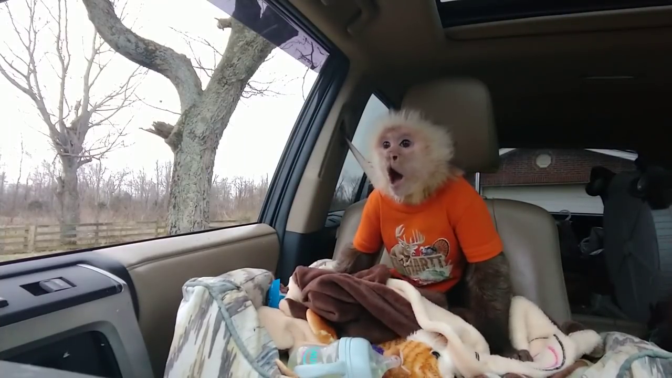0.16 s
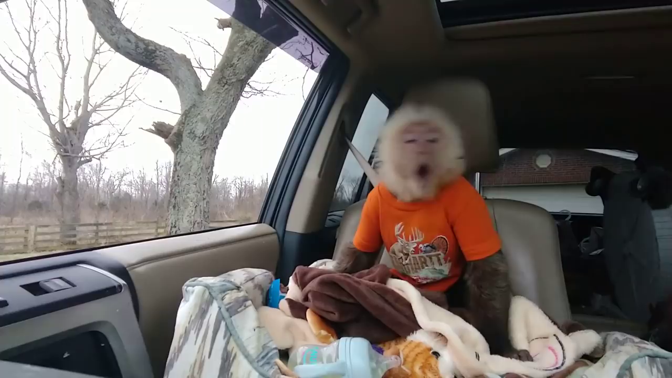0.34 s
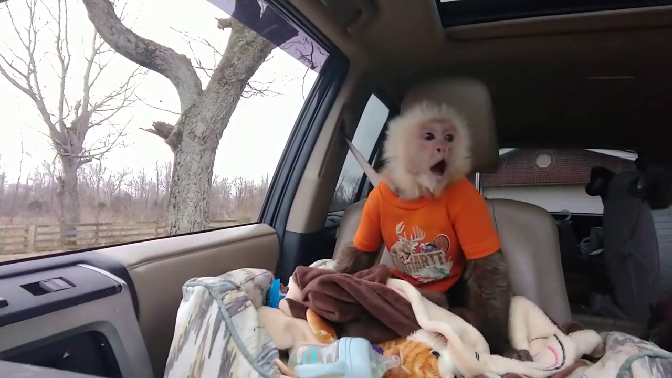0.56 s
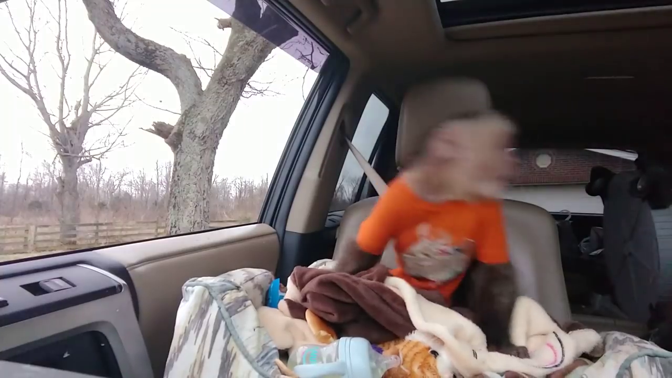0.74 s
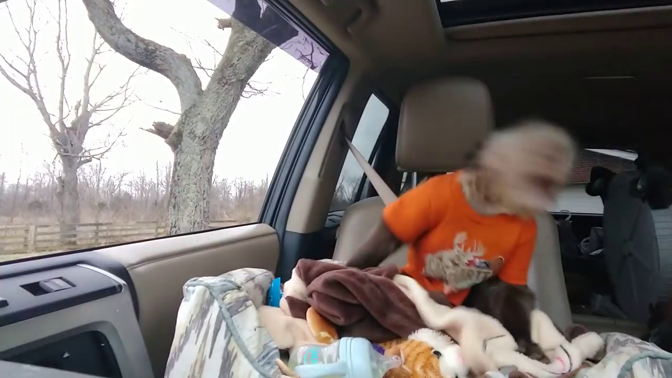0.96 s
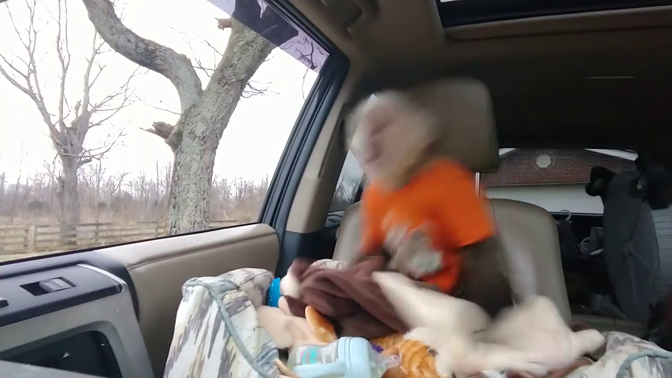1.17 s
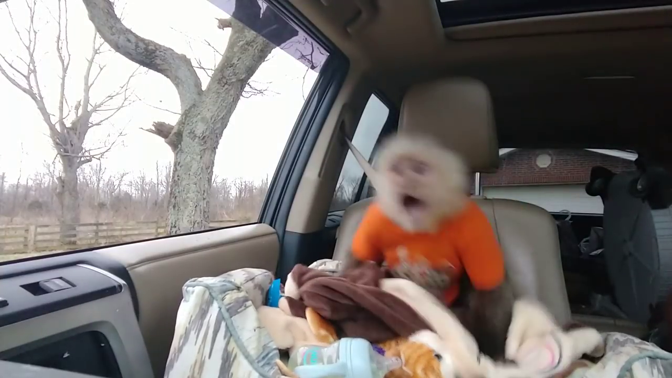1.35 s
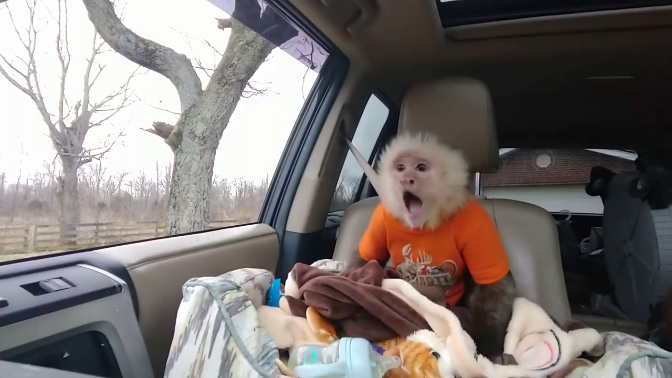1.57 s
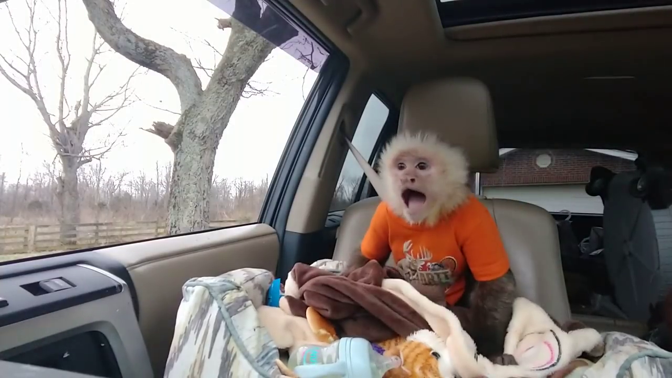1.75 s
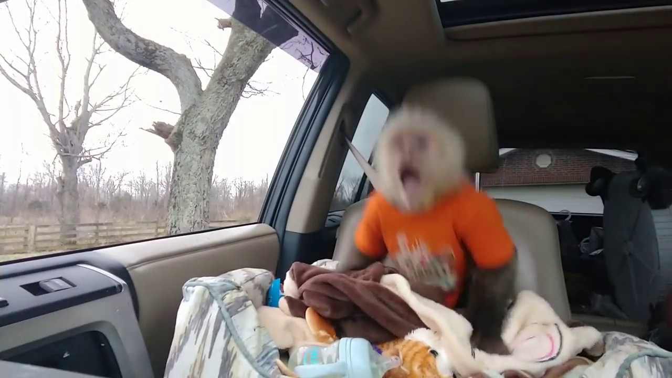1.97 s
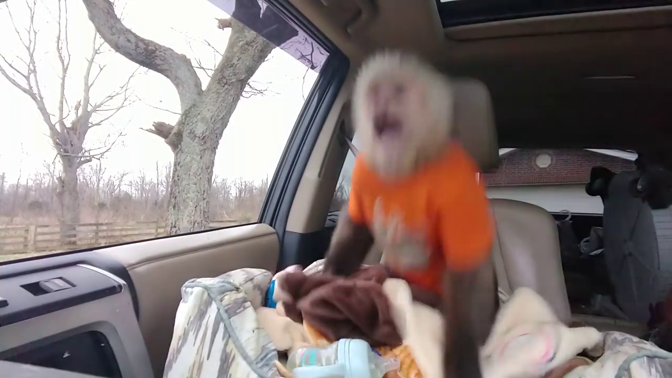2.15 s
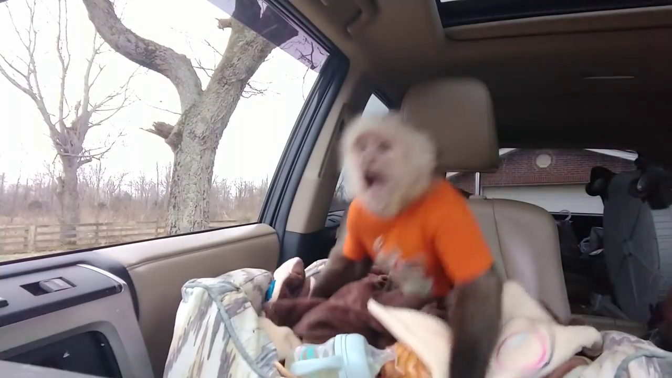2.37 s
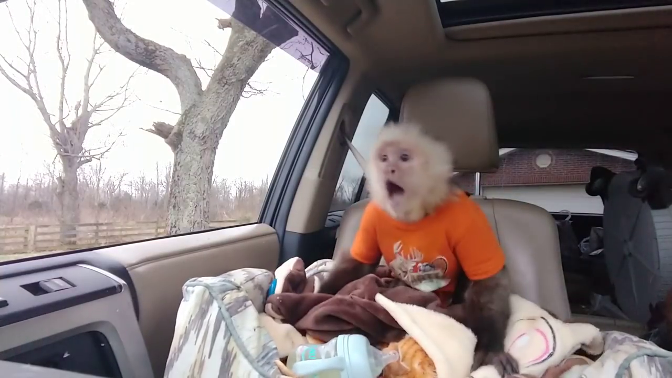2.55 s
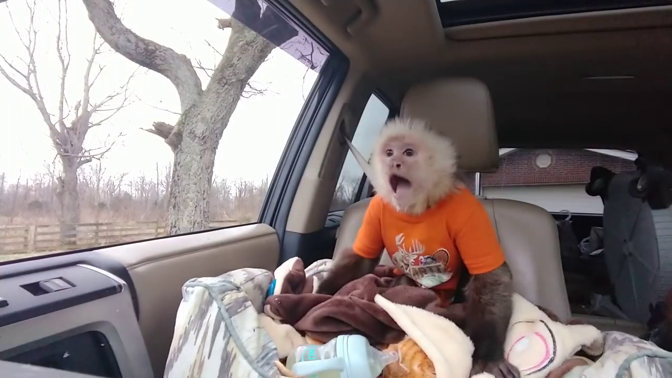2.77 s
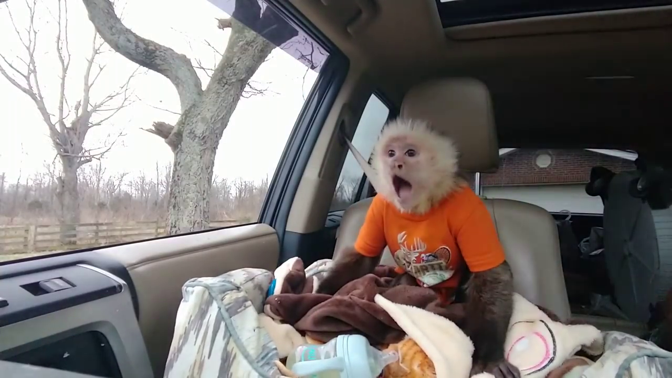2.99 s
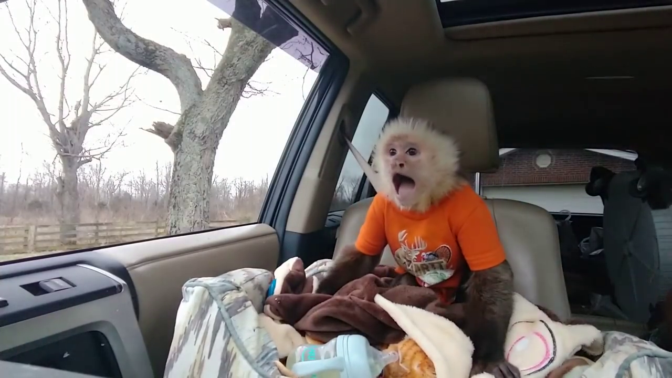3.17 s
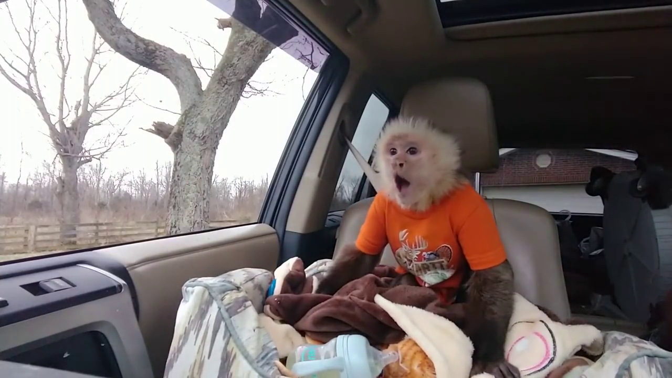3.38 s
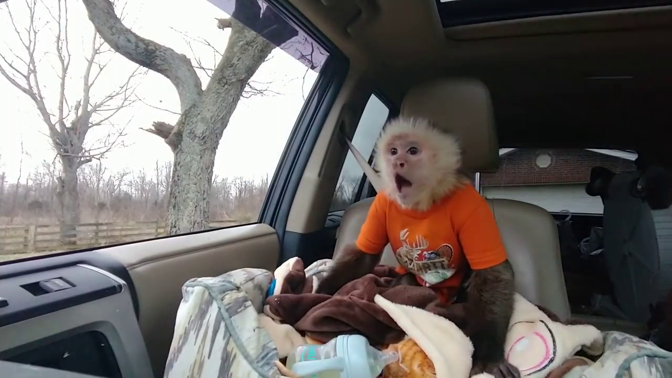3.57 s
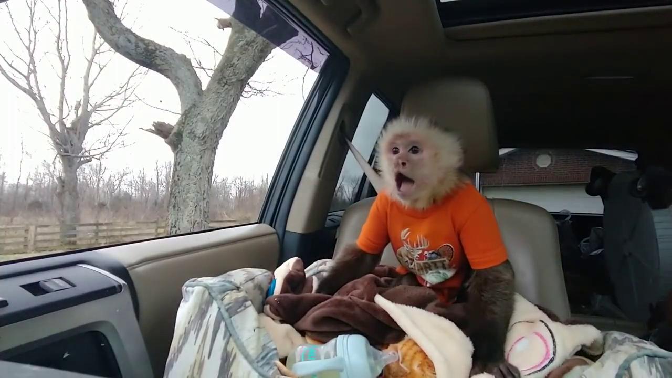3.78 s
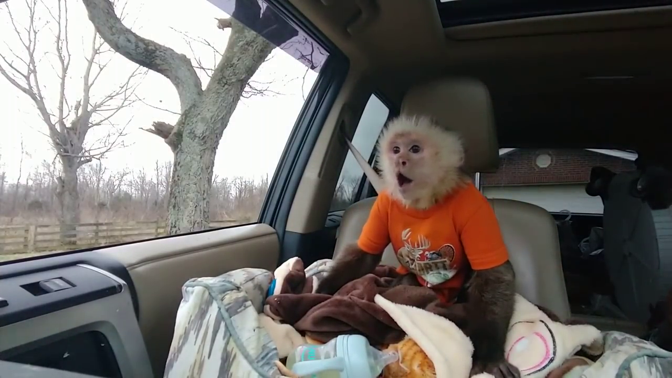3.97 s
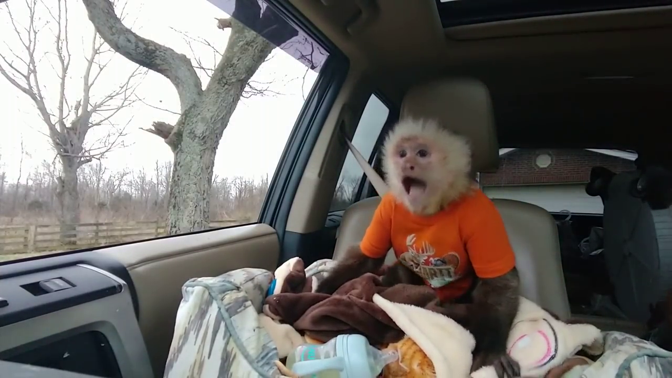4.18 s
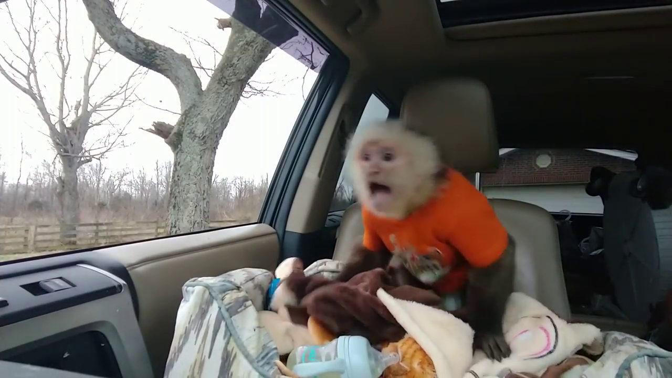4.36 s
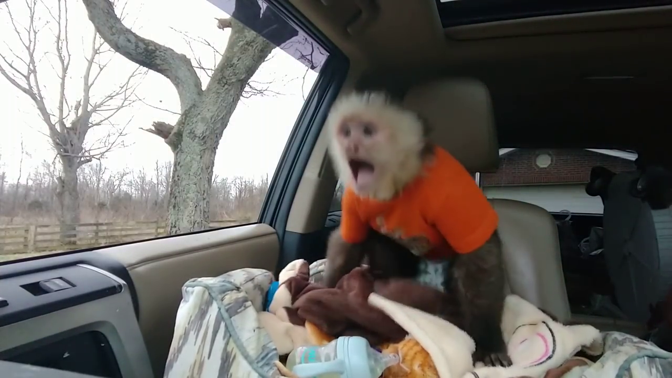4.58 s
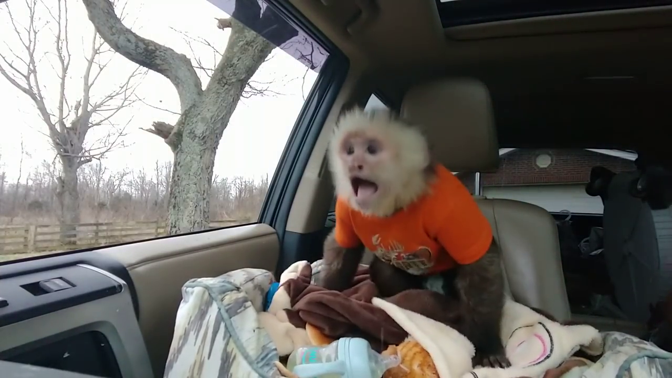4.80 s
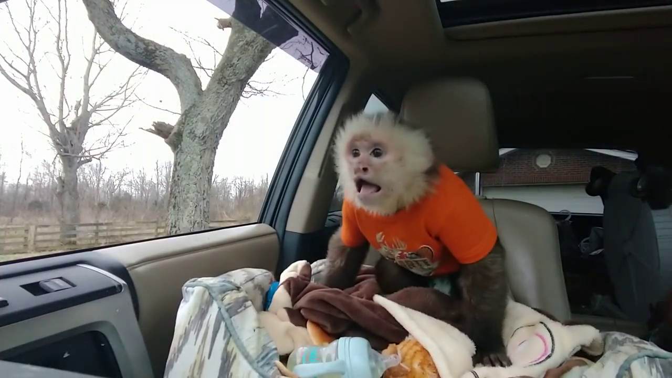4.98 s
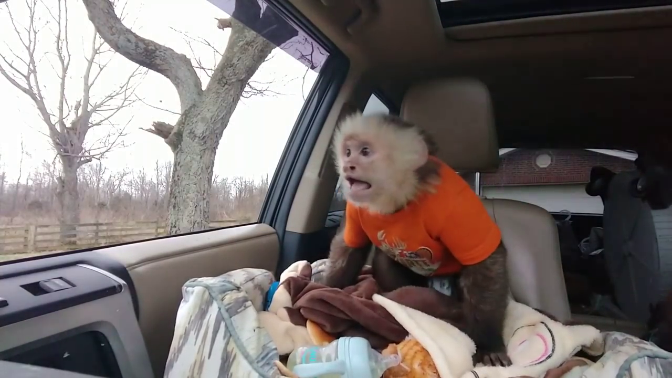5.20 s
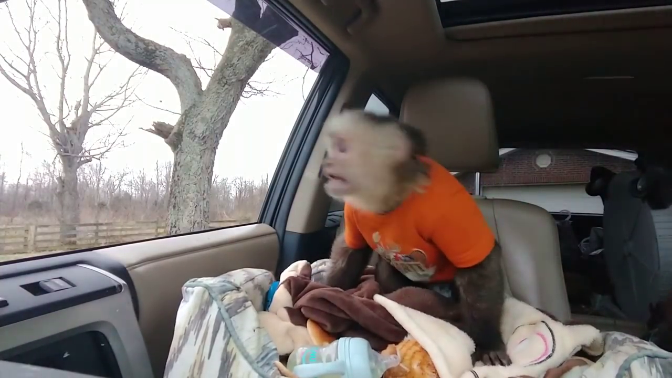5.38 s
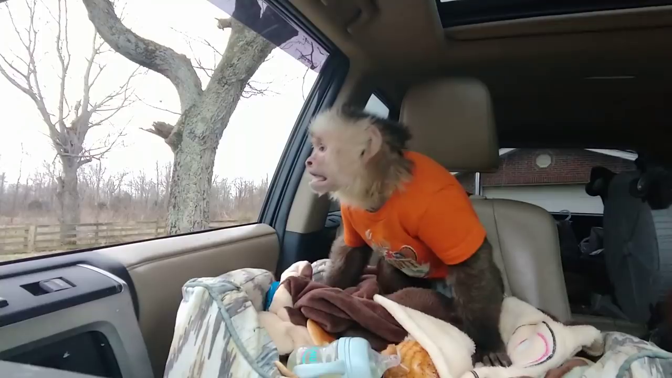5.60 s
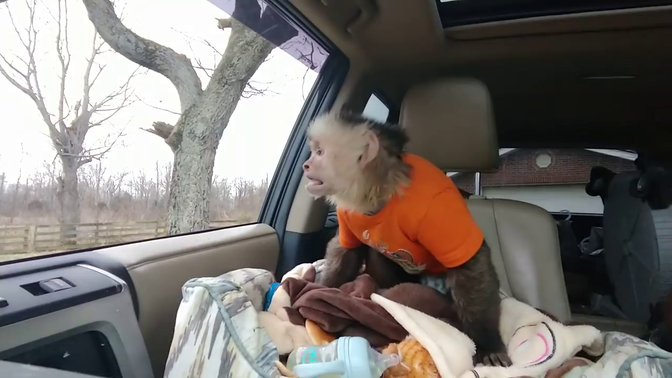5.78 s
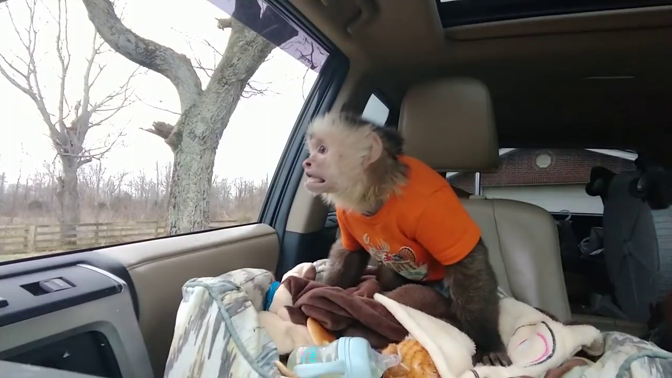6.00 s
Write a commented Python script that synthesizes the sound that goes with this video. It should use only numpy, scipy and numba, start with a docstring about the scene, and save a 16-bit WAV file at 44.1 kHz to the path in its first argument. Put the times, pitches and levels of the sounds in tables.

```python
"""First a rasping bark, already running on into a growl: a small monkey on a car seat, an arm's length from a phone.
It barks alarm calls: slapping folds and rushing air ring through throat, mouth and lips. Most barks open with
a clean squeak of gliding partials; some run on into a fluttering growl; low grunts and panting fall between.
The padded cabin rings briefly as decaying noise. Low rumble from outside, shaped noise, swells at the end
under faint far whistles, which are wavering sines. The phone hears the monkey through two ports."""
import sys
import numpy as np
from scipy import signal
from scipy.fft import rfft, irfft
from scipy.io import wavfile
from scipy.ndimage import uniform_filter1d
from numba import njit

SR = 44100
rng = np.random.default_rng(int(sys.argv[2]) if len(sys.argv) > 2 else 0)


def dump_mix(stems):
    """Bounce the given channels to the path in sys.argv[1] as a 16-bit WAV at rate SR."""
    frames = np.atleast_2d(stems).T  # one column per channel
    limited = np.clip(frames, -1, 1)  # hard clip at full scale
    pcm = np.round(limited * 32767).astype(np.int16)
    wavfile.write(sys.argv[1], SR, pcm)


N = 266496
TIME = np.arange(N) / SR  # s
TOP_HZ = 15900  # upper limit of the phone, and of the squeak partials


def undb(db):
    """Decibels to amplitude."""
    return 10 ** (np.asarray(db) / 20)


def unit(x):
    """Scale to an RMS of 1."""
    return x / np.sqrt(np.mean(x ** 2))


def add(out, s, sound):
    """Mix a sound in at a time in seconds."""
    i = int(s * SR)
    out[i:i + len(sound)] += sound[:N - i]


def shaped(x, points):
    """Gain from (frequency [Hz], level [dB]) points on a log-frequency axis."""
    hz, db = np.transpose(points)
    log_hz = np.log(np.arange(N // 2 + 1) * SR / N + 1)
    return irfft(rfft(x) * undb(np.interp(log_hz, np.log(hz), db)), N)


def wander(size):
    """Smooth chance of spread 1; size is the smoothing length in samples."""
    return unit(uniform_filter1d(uniform_filter1d(rng.standard_normal(N), size), size))


def lag(x, s):
    """Sluggish follower with a time constant in seconds."""
    return signal.lfilter([1 / (s * SR)], [1, 1 / (s * SR) - 1], x)


@njit
def band(x, g, k):
    """State-variable band-pass whose centre may move."""
    y, b, l = np.empty(len(x)), 0., 0.
    for i in range(len(x)):
        v = (b + g[i] * (x[i] - l)) / (1 + g[i] * (g[i] + k))
        b, l, y[i] = 2 * v - b, l + 2 * g[i] * v, k * v
    return y


def ring(x, modes, shift=1):
    """Sum of resonances, each passed twice for steep skirts; shift scales all centres; RMS of 1."""
    out = 0
    for k, (hz, width, db) in enumerate(modes):
        g = np.tan(np.pi * hz / SR) * shift * np.ones(N)
        once = band(x + 1e-18, g, width / hz)
        twice = band(once, g, width / hz)
        out = out + (-1) ** k * undb(db) * twice  # neighbours in opposite sign
    return unit(out)


def cycles(hz, jitter):
    """Sample indices of uneven cycles at a moving rate."""
    turns = np.cumsum(hz) / SR
    marks = np.cumsum(np.exp(jitter * rng.standard_normal(N // 10) - jitter ** 2 / 2))
    return np.searchsorted(turns, marks[marks < turns[-1]])


def slaps(hz, jitter, scatter_db):
    """One click of uneven size per cycle."""
    out, i = np.zeros(N), cycles(hz, jitter)
    out[i] = undb(scatter_db * rng.standard_normal(N // 10))[:len(i)]
    return unit(out)


# rumble outside the car, spectrum: (frequency [Hz], level [dB])
RUMBLE_SPECTRUM = [(25, -15.5), (70, -5), (230, 1), (480, -10), (1200, -17.5), (3000, -58.5)]
# rumble swelling towards the end: (time [s], level [dB])
RUMBLE_SWELL = [(0, -61), (4.3, -60.5), (5.2, -57), (5.6, -52), (6.04, -48)]
# steady hiss, spectrum: (frequency [Hz], level [dB])
HISS_SPECTRUM = [(1200, -46.5), (1600, -3), (2100, -16.5), (2800, -9), (5000, -17), (16000, -20)]
HISS_DB = -69  # before its late rise


def background():
    """Rumble, partly alike in both channels, and unrelated hiss that rises near the end too."""
    shared, left, right = (unit(shaped(rng.standard_normal(N), RUMBLE_SPECTRUM)) for _ in range(3))
    rumble = .7 * shared + .7 * np.array([undb(1.5) * left, undb(-1.5) * right])
    hiss = np.array([unit(shaped(rng.standard_normal(N), HISS_SPECTRUM)) for _ in range(2)])
    rumble_db = np.interp(TIME, *np.transpose(RUMBLE_SWELL))
    hiss_db = HISS_DB + np.interp(TIME, [5, 6], [0, 3])
    return undb(rumble_db) * rumble + undb(hiss_db) * hiss


# far whistles: (time [s], length [s], pitch at start [Hz], at end [Hz], level [dB])
FAR_WHISTLES = [(4.948, 0.13, 897, 920, -62), (5.287, 0.18, 903, 920, -61), (5.799, 0.24, 1385, 960, -59),
                (5.906, 0.19, 1547, 1120, -61)]


def whistles():
    """Thin wavering tones: sines whose pitch glides and trembles."""
    out = np.zeros(N)
    for s, length, a_hz, b_hz, db in FAR_WHISTLES:
        u = np.linspace(0, 1, int(length * SR))
        tremble = .5 * uniform_filter1d(rng.standard_normal(len(u)), size=300)
        hz = (a_hz + (b_hz - a_hz) * u) * (1 + tremble)
        add(out, s, undb(db) * np.sin(np.pi * u) ** .5 * np.sin(2 * np.pi * np.cumsum(hz) / SR))
    return out


CABIN_T60_S, CABIN_DB = 0.041, -5


def cabin(x):
    """Dense short reflections from glass and trim, different at each channel; too small a space to scatter bass."""
    t = np.arange(int(.2 * SR)) / SR
    tail = rng.standard_normal((2, len(t))) * np.exp(-np.log(1000) * t / CABIN_T60_S) * (t > .002)
    tail = tail / np.sqrt(np.sum(tail ** 2, axis=1, keepdims=True))
    upper = signal.lfilter(*signal.butter(1, 1400, "high", fs=SR), x)
    return undb(CABIN_DB) * signal.fftconvolve(upper[None], tail, axes=1)[:, :N]


# resonances of the monkey's tract, also used by its voice: (centre [Hz], width of each pass [Hz], level [dB])
THROAT_MODES = [(931, 160, 3.3), (1252, 500, 3.6), (1846, 290, 2.1)]
MOUTH_MODES = [(2480, 2000, 6.5), (3256, 130, 13.6)]
LIPS_MODES = [(5200, 1100, -2), (7086, 1360, -11), (7890, 1700, -6), (9930, 1900, -21.5),
              (13400, 2800, -23.5)]
# panting: (time [s], length [s], level [dB])
BREATHS = [(0.176, 0.14, -63.5), (0.67, 0.15, -61.5), (1.542, 0.085, -51.5), (1.875, 0.093, -53.5),
           (2.229, 0.15, -56), (2.913, 0.07, -52.5), (3.227, 0.16, -55.5), (4.795, 0.1, -67)]
PANT_EDGE_DB, PANT_PEAK = -8, .6  # level at both ends; share of the length before the peak


def panting():
    """Plain air through the same throat and mouth, swelling to a peak."""
    air, gain = rng.standard_normal(N), np.zeros(N)
    for s, length, db in BREATHS:
        u = np.linspace(0, 1, int(length * SR))
        swell_db = np.interp(u, [0, PANT_PEAK, 1], [PANT_EDGE_DB, 0, PANT_EDGE_DB])
        add(gain, s, undb(db + swell_db) * np.sin(np.pi * u) ** .2)
    return gain * (ring(air, THROAT_MODES) + undb(4.0) * ring(air, MOUTH_MODES) + undb(1.5) * ring(air, LIPS_MODES))


# chest resonances: (centre [Hz], width of each pass [Hz], level [dB])
CHEST_MODES = [(196.5, 120, 0.5), (392, 230, 6.5)]
# low voiced grunts as the folds slacken:
# (time [s], length [ms], pitch at start [Hz], at end [Hz], chest level [dB], throat minus chest [dB])
LOW_GRUNTS = [(0.109, 34, 495.3, 396, -36.5, 8.5), (0.386, 50.5, 560, 410, -43.5, -10),
              (0.497, 61, 553.8, 327, -41.5, -1.5), (0.538, 105, 539.7, 392, -39, 6),
              (.88, 23, 532, 378, -36.5, 8.5), (1.151, 41, 540.5, 191, -34, -5),
              (1.263, 60, 521, 480, -38, -6), (2.427, 29.4, 304.4, 316, -35, 0),
              (3.462, 42.6, 335.5, 256, -35.5, -1), (3.741, 45, 292.6, 220, -32.5, -1),
              (4.144, 35, 405.8, 209, -37.5, -10), (4.466, 35, 473.5, 231, -42, -10),
              (4.57, 178, 100.2, 87, -34, -0.5)]


def grunts():
    """Unsteady glottal buzz of mostly falling pitch, heard through chest and throat."""
    hz, chest, throat = np.full(N, 300.), np.zeros(N), np.zeros(N)
    for s, ms, a_hz, b_hz, db, throat_db in LOW_GRUNTS:
        u = np.linspace(0, 1, int(ms * SR / 1000))
        add(hz, s, a_hz * (b_hz / a_hz) ** u - 300)  # offset from the resting 300 Hz
        add(chest, s, undb(db) * np.sin(np.pi * u) ** 0.19)
        add(throat, s, undb(db + throat_db) * np.sin(np.pi * u) ** 0.23)
    turn = 2 * np.pi * np.cumsum(hz * (1 + .05 * wander(size=90))) / SR
    partials = sum(np.cos(k * turn) * (k * hz < 2200) * (k * hz > 150) for k in range(1, 23))
    buzz = np.sqrt(hz / 300) * partials * undb(3 * wander(size=120))
    return chest * ring(buzz, CHEST_MODES) + throat * ring(buzz, THROAT_MODES)


# squeaks: (time [s], length [ms], pitch at start, middle, end [Hz], level before the envelope [dB],
# second partial [dB], step for each higher partial [dB])
SQUEAK_NOTES = [(0.328, 17.3, 1997, 3010, 2380, -8, -1.5, -11.5),
                (0.442, 35, 1023, 1870, 3600, -30, -32.5, 1),
                (0.819, 19.4, 1984, 2850, 2730, -13.5, -1.5, -7.5),
                (1.095, 11.5, 1557, 1860, 2230, -19.5, -4, -4.5),
                (1.1046, 4.25, 2700, 2780, 3200, 1, -6, 1.5),
                (1.635, 9.3, 2190, 2730, 3320, -7.5, -0.5, -3),
                (1.968, 10.2, 2034, 2820, 3750, -7.5, -3.5, -2),
                (2.369, 21.15, 1347, 2540, 2930, -10.5, -3, -2.5),
                (2.545, 10.7, 1640, 1800, 1750, -23, 3, -5.5),
                (2.619, 18, 1097, 1034, 880, -26, -11.5, 1.5),
                (2.633, 12.5, 1320, 1500, 1300, -19.5, -20, -2),
                (2.672, 14.3, 2541, 2950, 1870, -12, -2.5, -6),
                (2.988, 13.93, 2714, 3440, 4260, -7, -2, -3.5),
                (3.410, 16.2, 2592, 2670, 2380, -9.5, -1.5, -4.5),
                (3.694, 18, 2495, 2820, 2300, -14.5, 3.5, -4),
                (4.114, 10.7, 2320, 2310, 2400, -28.5, 14.5, -7),
                (4.12, 23.8, 1860, 1460, 1490, -9.5, -17.5, 3), (4.139, 17, 1591, 1430, 800, -17, -3.5, -2),
                (4.274, 15.1, 1300, 1475, 1850, -9, -7.5, 2), (4.291, 18.3, 1366, 940, 1100, -25, -13, 5.5),
                (4.42, 27.4, 1401, 1020, 920, -21.5, -10, 3),
                (4.445, 25.6, 1537, 1280, 1210, -19.5, -6, -3.5),
                (4.541, 9.2, 1307, 1480, 1400, -13.5, -13.5, 1.5)]
# colour the tract gives the squeaks: (frequency [Hz], level [dB])
SQUEAK_COLOUR = [(1400, -2.5), (2050, -4), (3100, 4), (4200, -4), (5200, 0.5)]
SQUEAK_THIN_DB = -9  # added once more at the fourth, fifth and sixth partials, then held


def squeaks():
    """Tight folds sing a gliding note with nine partials that turns ragged at its end."""
    out, shake, flicker = np.zeros(N), wander(size=25), wander(size=7)
    for s, ms, a_hz, b_hz, c_hz, db, second_db, step_db in SQUEAK_NOTES:
        u, i = np.linspace(0, 1, int(ms * SR / 1000)), int(s * SR)
        hz = np.polyval(np.polyfit([0, .5, 1], [a_hz, b_hz, c_hz], 2), u)
        hz = hz * (1 + .05 * u ** 3 * shake[i:][:len(u)])
        turn = 2 * np.pi * np.cumsum(hz) / SR
        higher = [second_db + step_db * k + SQUEAK_THIN_DB * min(k - 1, 3.) for k in range(1, 8)]
        note = 0
        for k, level_db in enumerate([0, second_db] + higher, start=1):
            # partials above 9 kHz fade by a few dB per kHz
            top_db = -4.1 * np.maximum(k * hz / 1000 - 9, 0)
            note = note + (k * hz < TOP_HZ) * undb(level_db + top_db) * np.sin(k * turn)
        note = note * (1 + (.07 + .18 * u ** 2) * flicker[i:][:len(u)])
        rise = np.minimum(u * ms / 3.5, 1) ** 0.78 * (0.56 + 0.27 * u)
        release = np.minimum((1 - u) * ms / 4, 1)
        add(out, s, undb(db) * rise * release * note)
    return shaped(out, SQUEAK_COLOUR)


FADE_DB = -40  # loss by the end of a fade or release
# growls: (start time [s], end time [s], throat level at start [dB], at end [dB], mouth level [dB],
# depth of the flutter [0-1], reference time for counting flaps [s], sometimes before the growl,
# flap rate at that time [Hz])
GROWL_CALLS = [(0.032, 0.141, -27.5, -33, -41.5, 0.3, 0.048, 65.4),
               (0.514, 0.62, -30, -32, -45, .45, .534, 60.7),
               (1.304, 1.371, -27, -27.5, -37.5, 0.7, 1.327, 118.6),
               (1.381, 1.503, -21, -23, -30, 0.5, 1.2, 111.6),
               (1.685, 1.831, -32, -24, -39.5, .65, 1.41, 108.3),
               (2.042, 2.186, -26, -28, -33, .45, 2.056, 137.6),
               (2.721, 2.864, -27, -22, -34, 0.8, 2.736, 124.4),
               (3.035, 3.196, -29, -26.5, -34, 0.4, 2.83, 102.1),
               (4.58, 4.734, -24.5, -23.5, -24, .55, 4.603, 104.9)]
GROWL_ATTACK_S, GROWL_ATTACK_DB, GROWL_RELEASE_S, RELEASE_BEND = .03, -13.5, .036, 1.4
GROWL_LIPS_DB, FLUTTER_RISE_S, FLAP_SAG_HZ_PER_S = -44, .02, 100


def growls():
    """Gains of throat, mouth and lips (attack, a sloping hold, release), depth of the flutter and count of its flaps."""
    gains, flutter, flaps = np.zeros((3, N)), np.zeros(N), np.zeros(N)
    for s, end, a_db, b_db, mouth_db, depth, reference_s, flap_hz in GROWL_CALLS:
        t = np.arange(int((end - s + 2 * GROWL_RELEASE_S) * SR)) / SR
        attack_db = GROWL_ATTACK_DB * np.maximum(1 - t / GROWL_ATTACK_S, 0)
        release_db = FADE_DB * (np.maximum(t - end + s, 0) / GROWL_RELEASE_S) ** RELEASE_BEND
        throat_db = np.interp(t, [0, end - s], [a_db, b_db])
        for gain, db in zip(gains, (throat_db, mouth_db, GROWL_LIPS_DB)):
            add(gain, s, undb(db + attack_db + release_db))
        span = slice(int(s * SR), int(s * SR) + len(t))
        flutter[span] = depth * np.minimum(t / FLUTTER_RISE_S, 1)
        since = t + s - reference_s
        flaps[span] = since * (flap_hz - FLAP_SAG_HZ_PER_S * since / 2)
    return gains, flutter, flaps


# the mouth gapes in or at the edges of growls:
# (centre time [s], standard deviation of the bell [ms], peak level of throat, mouth, lips [dB])
MOUTH_GAPES = [(0.084, 13.6, -21.5, -24, -24.5), (0.546, 4.9, -28, -42, -36.5),
               (1.357, 14.3, -20, -12.5, -23.5), (1.499, 12, -64, -30.5, -43),
               (1.82, 14.3, -33, -18, -25.5), (2.07, 9.5, -21, -46, -45), (2.16, 13, -27, -20.5, -26.5),
               (2.867, 9.9, -42.5, -27.5, -34), (3.098, 14.5, -28, -32, -44),
               (3.189, 14.1, -33, -18.5, -22), (4.576, 11.2, -29, -24, -23.5)]
LIPS_LAG_S = 0.0045


def gapes():
    """Brief bell-shaped swells of the three gains; the lips come last."""
    gains = np.zeros((3, N))
    for s, ms, *dbs in MOUTH_GAPES:
        bump = np.exp(-.5 * np.linspace(-4, 4, int(8 * ms * SR / 1000)) ** 2)
        for gain, db, late_s in zip(gains, dbs, (0, 0, LIPS_LAG_S)):
            add(gain, s - 4 * ms / 1000 + late_s, undb(db) * bump)
    return gains


# rasping barks: (time [s], throat swell [ms], throat fade [ms], mouth and lips fade [ms],
# level of throat, mouth, lips [dB])
BARK_CALLS = [(0.0, 1.4, 50, 200, -21, -28.5, -39), (0.339, 10.9, 81, 130, -16.5, -22, -24),
              (0.449, 20.5, 53, 270, -15.5, -25, -31.5), (0.831, 7.76, 110.5, 133, -21, -25, -28.5),
              (1.109, 19.2, 83, 117, -23.5, -16, -18.5), (1.231, 13.8, 85, 220, -25, -16, -23),
              (1.644, 8, 75, 94.7, -23, -17, -22), (1.976, 6.13, 103, 127, -21.5, -17, -21),
              (2.383, 22.5, 85, 103, -21.5, -18.5, -22.5), (2.556, 12.7, 87, 52, -27, -20.5, -14.5),
              (2.623, 12.3, 50.7, 43, -43, -30.5, -27.5), (2.682, 33.4, 54.2, 102, -21, -21, -23.5),
              (2.997, 8, 80, 72, -25.5, -15, -18), (3.424, 17.1, 97.5, 95, -23, -22.5, -22),
              (3.711, 13, 95.6, 91, -22, -23.5, -23.5), (4.134, 7.2, 65.7, 67, -21.5, -29, -27),
              (4.29, 1.27, 78.5, 74, -28.5, -24.5, -25), (4.438, 34, 52.4, 73, -35.5, -27, -24.5),
              (4.55, 1.32, 110, 123, -26.5, -20.5, -20.5)]
BARK_ATTACK_S, SWELL_DB = .0015, -12.5  # SWELL_DB: where the throat swell starts
BRIGHT_ATTACK_SHARE = 0.19  # of the throat swell
THROAT_BEND, MOUTH_BEND, LIPS_BEND = 1.3, 0.76, 0.91  # over 1 the fade lingers, then drops
BURST_SHARE, BURST_BEND, TAIL_DB = .65, 2.8, -8  # burst holds for part of the fade, then drops to a tail


def fall(u, tail_db):
    """A burst that drops away over a lower tail; u is the share of the fade passed."""
    burst = undb(FADE_DB * (u / BURST_SHARE) ** BURST_BEND)
    return (burst + undb(TAIL_DB + tail_db)) / (1 + undb(TAIL_DB))


def barks():
    """Gains of throat, mouth and lips: the bright part bursts out first, the throat swells after it, all fade."""
    gains, ms = np.zeros((3, N)), np.arange(int(.3 * SR)) * 1000 / SR
    attack = np.minimum(ms / 1000 / BARK_ATTACK_S, 1)
    for s, swell, fade, bright, db, mouth_db, lips_db in BARK_CALLS:
        u = np.maximum(ms - swell, 0) / fade
        swell_db = SWELL_DB * np.maximum(1 - ms / swell, 0)
        add(gains[0], s, attack * undb(db + swell_db) * fall(u, FADE_DB * u ** THROAT_BEND))
        opens = np.minimum(attack, ms / (BRIGHT_ATTACK_SHARE * swell))
        mouth_fall = fall(ms / (swell + fade), FADE_DB * (ms / bright) ** MOUTH_BEND)
        add(gains[1], s, opens * undb(mouth_db) * mouth_fall)
        add(gains[2], s, opens * undb(lips_db + FADE_DB * (ms / bright) ** LIPS_BEND))
    return gains


# resonances in growls and, for the lips, in gapes: (centre [Hz], width of each pass [Hz], level [dB])
GROWL_THROAT_MODES = [(969, 260, -2), (1412, 550, -1), (1794, 450, 1)]
GROWL_MOUTH_MODES = [(2512, 560, 6), (3193, 270, 8.5), (3777, 570, -4), (4450, 580, -16)]
GAPE_LIPS_MODES = [(4650, 240, -1), (4970, 1420, 4), (6900, 1440, -12)]
# jaw and tongue movement, grouped by growl: (time [s], throat resonance [Hz], mouth resonance [Hz])
JAW_SHAPES = [
    [(0.04, 1412, 3006), (0.15, 1374, 2970)],
    [(0.51, 1450, 2970), (0.61, 1350, 3120), (0.64, 1286, 3153)],
    [(1.31, 1287, 3020), (1.52, 1409, 2820)],
    [(1.69, 1422, 2870), (1.76, 1303, 2939), (1.85, 1345, 3040)],
    [(2.04, 1325, 2910), (2.15, 1414, 3160), (2.2, 1377, 3233)],
    [(2.73, 1286, 2882), (2.844, 1392, 2956), (2.89, 1300, 2920)],
    [(3.05, 1303, 2920), (3.102, 1419, 2815), (3.21, 1275, 3053)],
    [(4.58, 1287, 2850), (4.75, 1337, 3157)],
]
THROAT_REST_HZ, MOUTH_REST_HZ, TRACT_DRIFT = 1340, 3050, .022
FOLDS_HZ, SLACK_PER_DB = 1450, .012  # slap rate at -20 dB effort; share of it lost per dB below
AIR_SHARE, GROWL_AIR_SHARE = .35, .4
GRIT_HZ, GRIT_DEPTH = 280, .33
MOUTH_CHOP_SHARE, LIPS_CHOP_SHARE, CHOP_WAVER, GAPE_DEPTH = .6, .6, .12, .45
CHEST_DB, CHEST_LAG_S = -17, 0.0072
GROWL_CHEST_DB = 2.5  # a growl stirs the chest more than a bark


def rasp():
    """Folds slap amid rushing air: ragged and gritty in barks and in the mouth and lips of growls, steadier in
    the growling throat; in growls slack tissue chops the flow."""
    bark, (growl, flutter, flaps), gape = barks(), growls(), gapes()
    effort_db = 20 * np.log10(bark[0] + growl[0] + 1e-3)
    s, throat_hz, mouth_hz = np.concatenate(JAW_SHAPES).T
    throat_hz, mouth_hz = np.interp(TIME, s, throat_hz), np.interp(TIME, s, mouth_hz)
    air = rng.standard_normal(N)

    # the ragged slaps slow down as the effort drops; those in the growling throat lock to its resonance
    folds_hz = FOLDS_HZ * np.exp(SLACK_PER_DB * (effort_db + 20) + .1 * wander(size=700))
    ragged = (1 - AIR_SHARE) * slaps(folds_hz, .15, 2) + AIR_SHARE * air
    grit = uniform_filter1d(uniform_filter1d(slaps(np.full(N, GRIT_HZ), .3, 3), size=50), size=30)
    ragged = ragged * (1 + GRIT_DEPTH * (grit / np.mean(grit) - 1))
    locked = slaps(throat_hz * (1 + .02 * wander(size=500)), .06, 1.5)
    steady = (1 - GROWL_AIR_SHARE) * locked + GROWL_AIR_SHARE * air

    # 2.4 keeps the mean opening near 1
    opening = 2.4 * np.abs(np.cos(np.pi * (flaps + .06 * wander(size=600)))) ** 3 * undb(wander(size=200))
    waver = 1 + CHOP_WAVER * wander(size=900)
    drift = [1 + TRACT_DRIFT * wander(size=1100) for _ in range(3)]
    moved = [np.sqrt(drift[0]) * throat_hz / THROAT_REST_HZ, drift[1] * mouth_hz / MOUTH_REST_HZ, drift[2]]
    growl_sources, chop_shares = (steady, ragged, ragged), (1, MOUTH_CHOP_SHARE, LIPS_CHOP_SHARE)
    voice = 0
    for gains, depth, tract, shifts, sources in (
            (bark, 0, (THROAT_MODES, MOUTH_MODES, LIPS_MODES), drift, (ragged,) * 3),
            (growl, flutter, (GROWL_THROAT_MODES, GROWL_MOUTH_MODES, LIPS_MODES), moved, growl_sources),
            (gape, GAPE_DEPTH, (GROWL_THROAT_MODES, GROWL_MOUTH_MODES, GAPE_LIPS_MODES), moved, growl_sources)):
        chop = np.clip(depth * waver, 0, 1)
        for gain, modes, share, shift, source in zip(gains, tract, chop_shares, shifts, sources):
            chopped = source * (1 + share * chop * (opening - 1))
            voice = voice + gain * ring(chopped, modes, shift)

    # the chest takes a moment to join in, and is driven by air alone
    late = lag(bark[0] + undb(GROWL_CHEST_DB) * (growl[0] + gape[0]), CHEST_LAG_S)
    chest_air = (1 + flutter * (opening - 1)) * rng.standard_normal(N)
    return voice + undb(CHEST_DB) * late * ring(chest_air, CHEST_MODES)


# weight of the port sum, before its fixed scale: (frequency [Hz], level [dB])
SIDE_WIDTH = [(300, -15), (1000, -30), (2000, 0.5), (4000, -2.5), (8000, 2)]
# lean of the direct sound, split between channels: (frequency [Hz], left minus right [dB])
CHANNEL_LEAN = [(1000, -1), (4000, -1.5), (8000, -3.5), (12000, -4)]
PORT_LAG_S = 0.000491
BASS_HZ = 470  # below this the phone increasingly takes one port alone


def ports(x):
    """Two ports some centimetres of path apart: their difference is the middle, their sum the side."""
    hz = np.arange(N // 2 + 1) * SR / N
    delay = np.exp(-2j * np.pi * hz * PORT_LAG_S)
    late = irfft(rfft(x) * delay * hz ** 2 / (hz ** 2 + BASS_HZ ** 2), N)
    mid, side = (x - late) * 0.5, shaped(x + late, SIDE_WIDTH) * 0.35
    left = shaped(mid - side, np.array(CHANNEL_LEAN) * [1, .5])
    right = shaped(mid + side, np.array(CHANNEL_LEAN) * [1, -.5])
    return np.array([left, right])


def scene():
    """The monkey, direct through the ports and echoed by the cabin, over the sounds from outside and hiss."""
    monkey = rasp() + squeaks() + grunts() + panting()
    monkey = signal.sosfilt(signal.butter(2, 110, "high", fs=SR, output="sos"), monkey)
    return ports(monkey) + cabin(monkey) + background() + whistles()


def record(dry):
    """The phone loses the deepest bass and cuts the top."""
    dry = signal.sosfilt(signal.butter(2, 45, "high", fs=SR, output="sos"), dry)
    return signal.sosfilt(signal.ellip(10, .2, 70, TOP_HZ, fs=SR, output="sos"), dry)


dry = scene()
out = record(dry)
dump_mix(out)
```